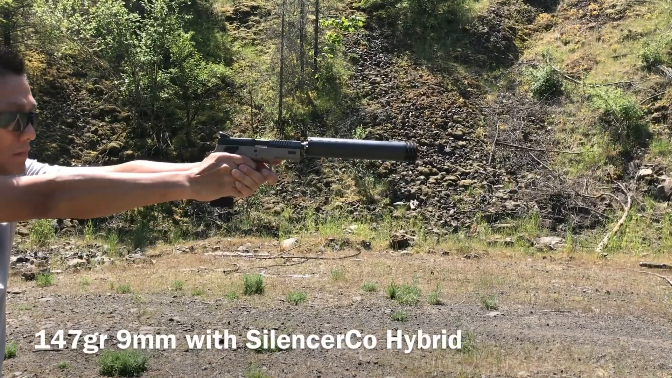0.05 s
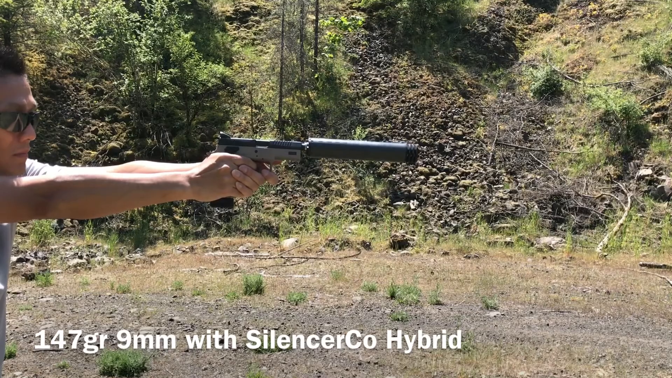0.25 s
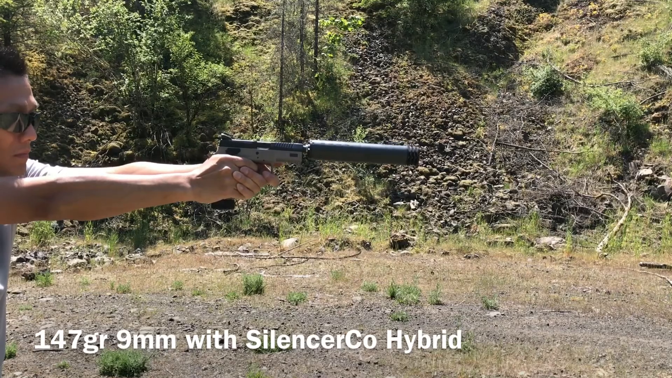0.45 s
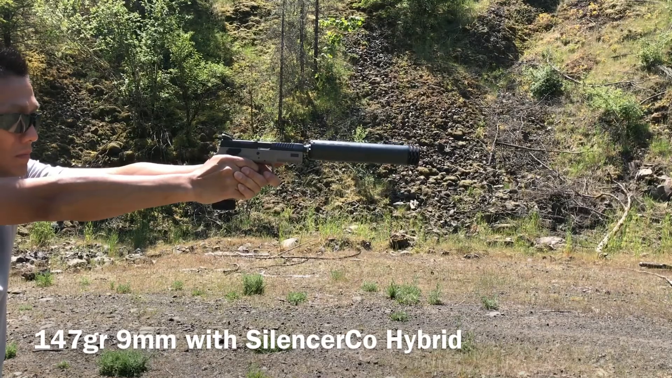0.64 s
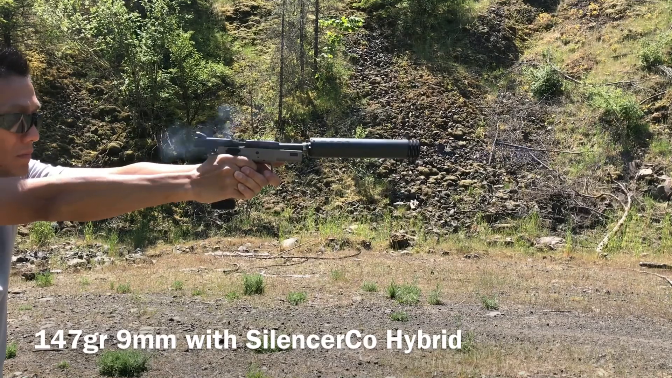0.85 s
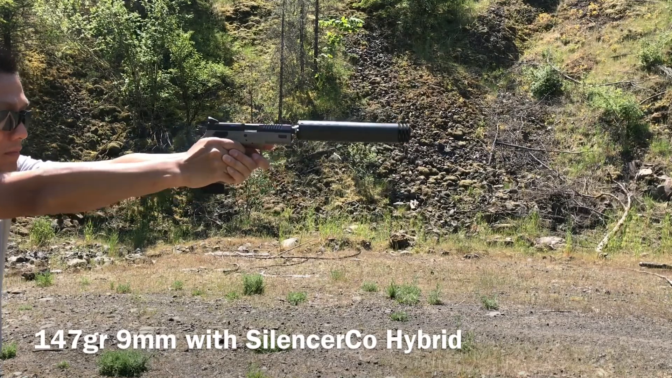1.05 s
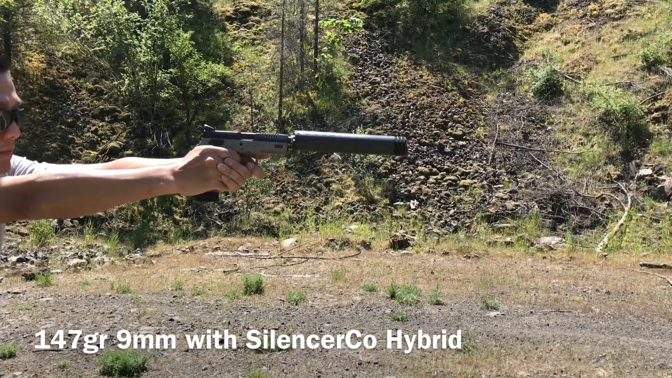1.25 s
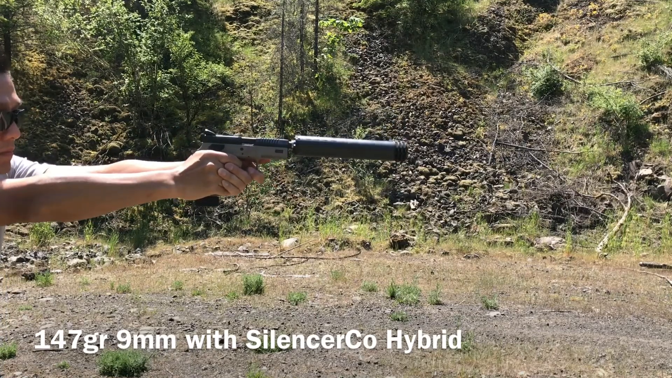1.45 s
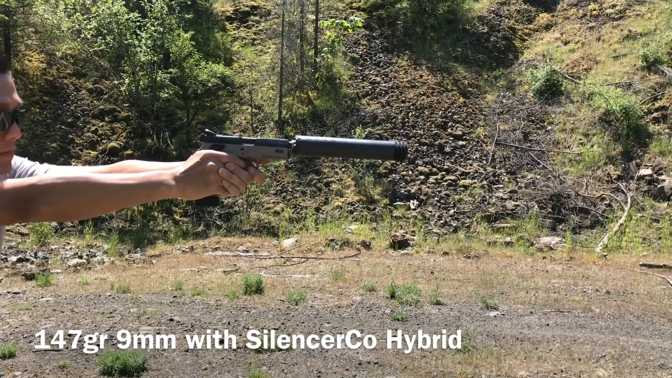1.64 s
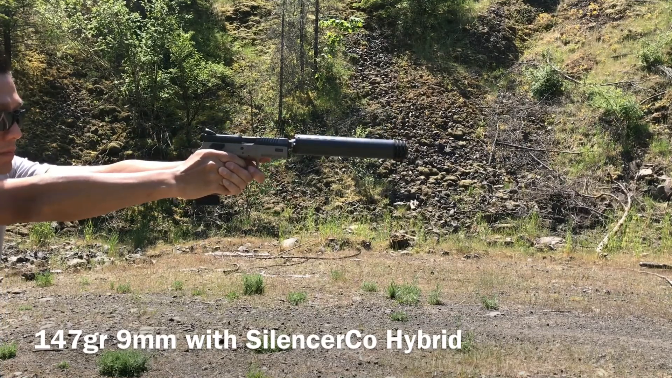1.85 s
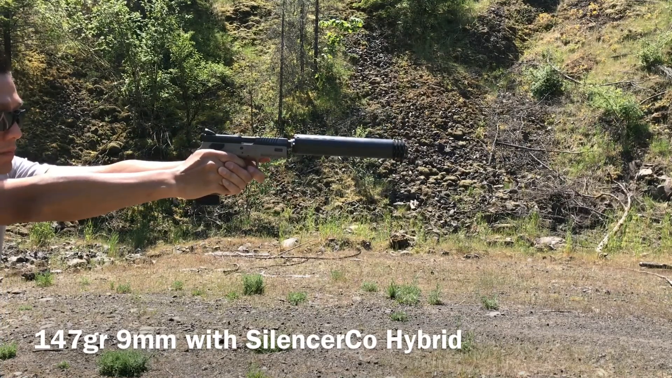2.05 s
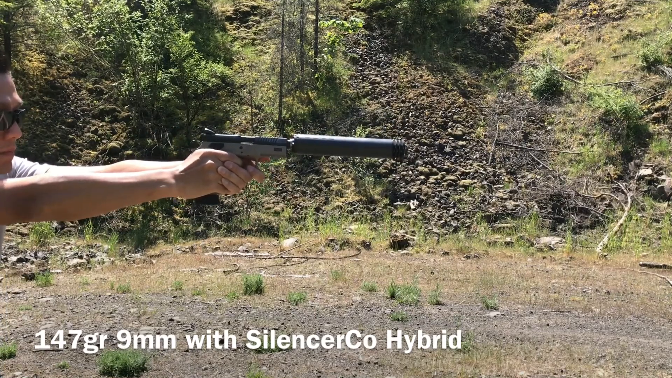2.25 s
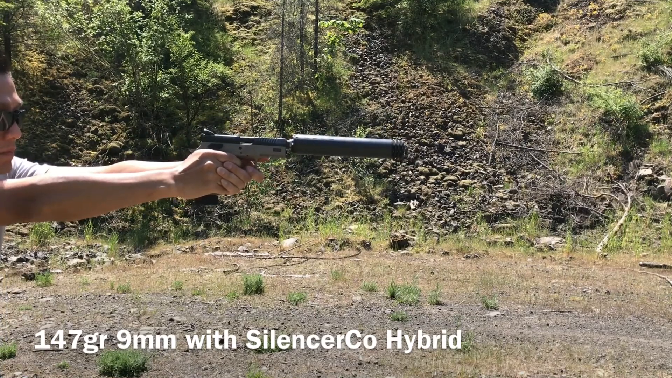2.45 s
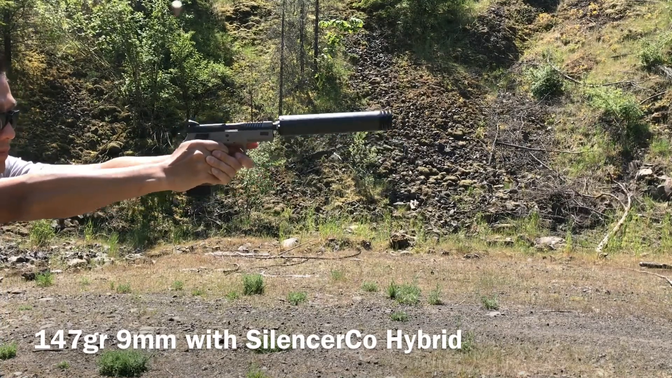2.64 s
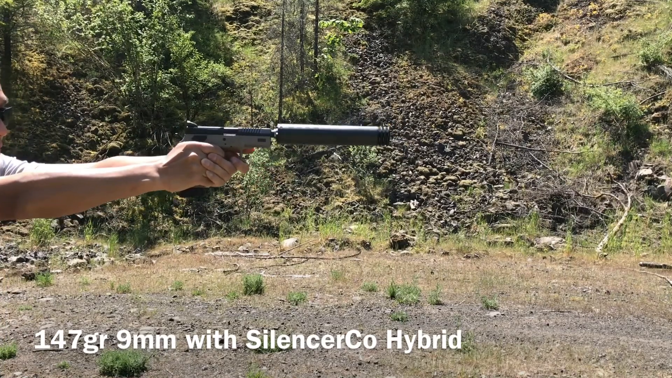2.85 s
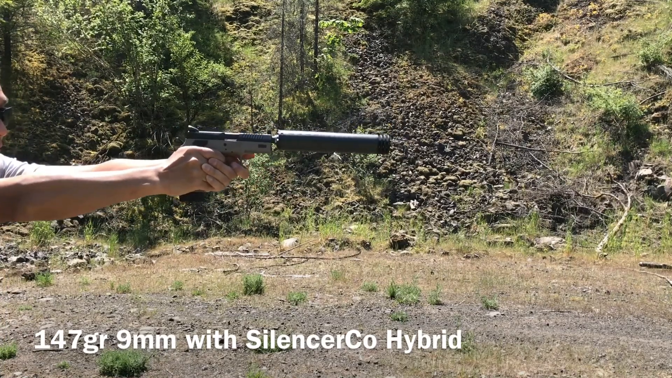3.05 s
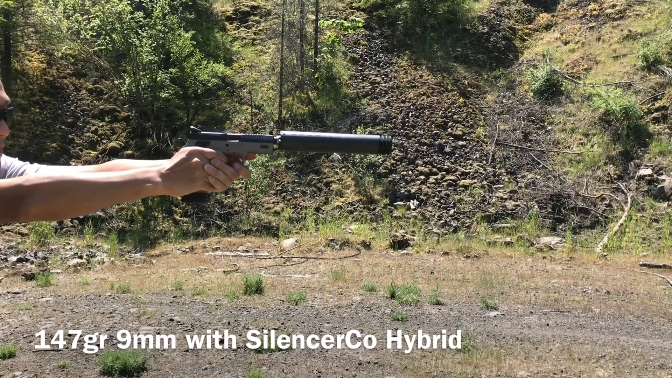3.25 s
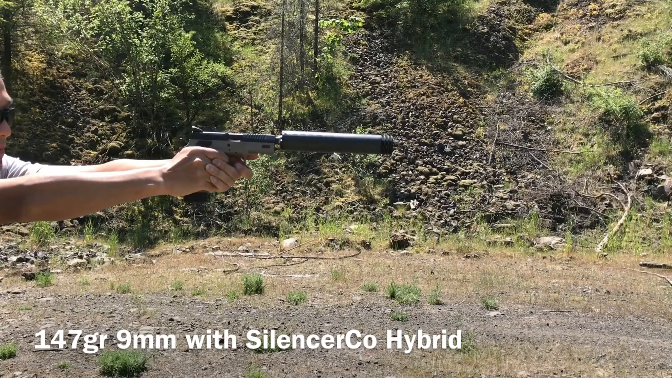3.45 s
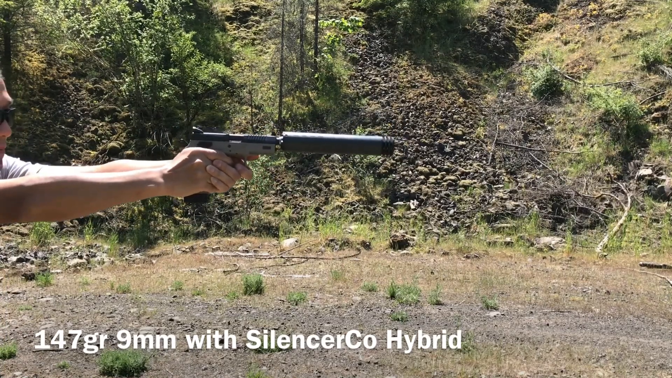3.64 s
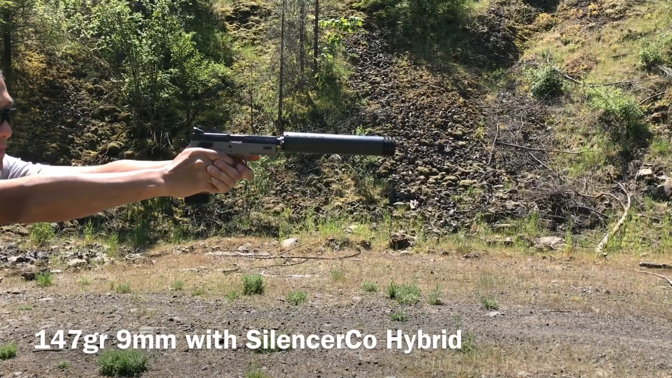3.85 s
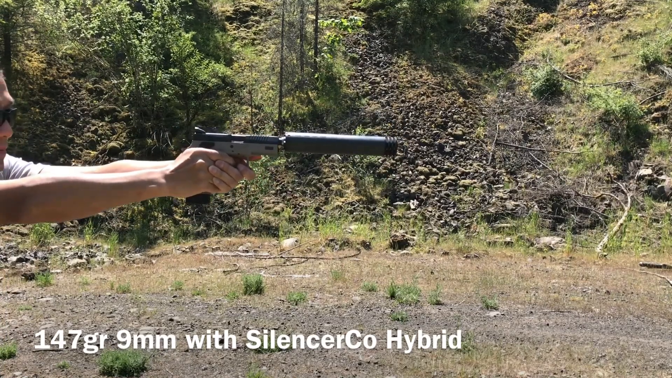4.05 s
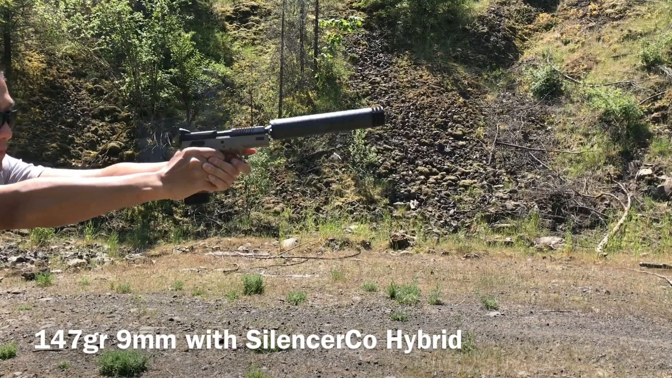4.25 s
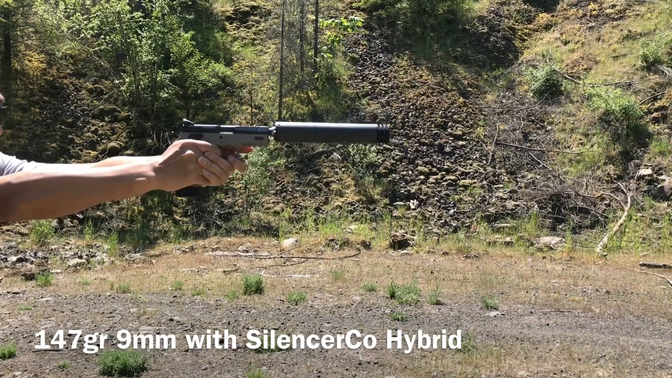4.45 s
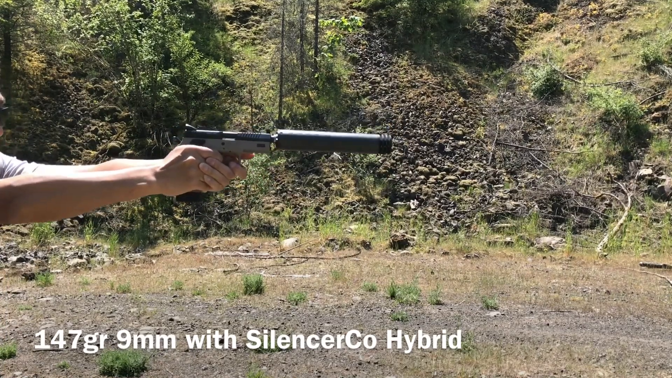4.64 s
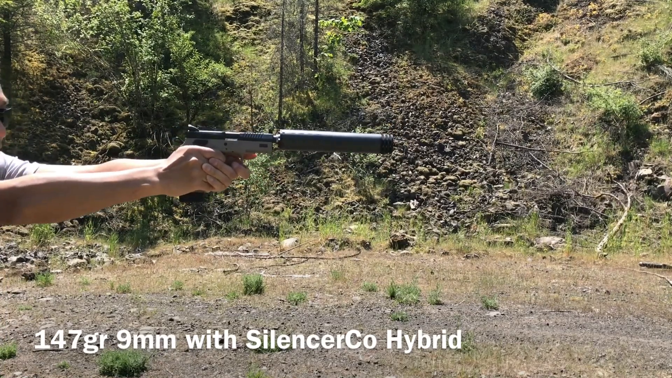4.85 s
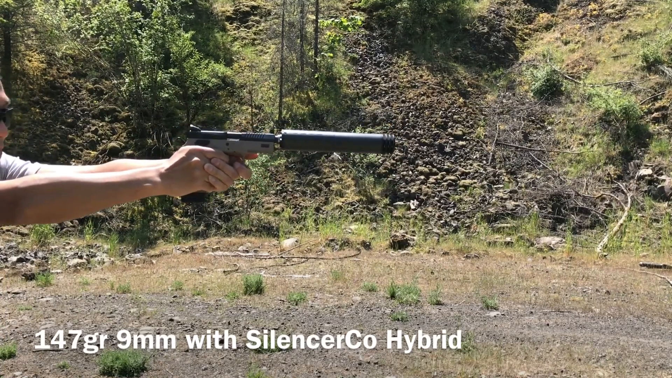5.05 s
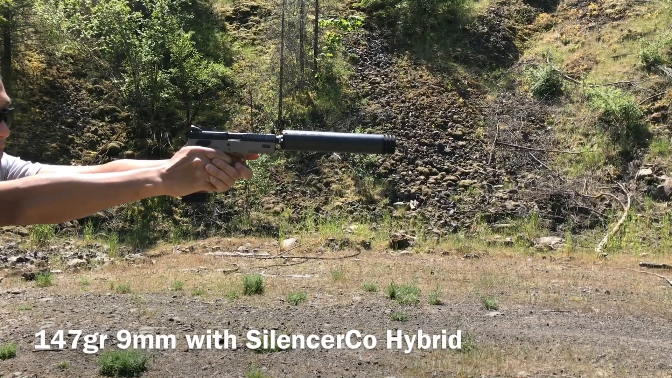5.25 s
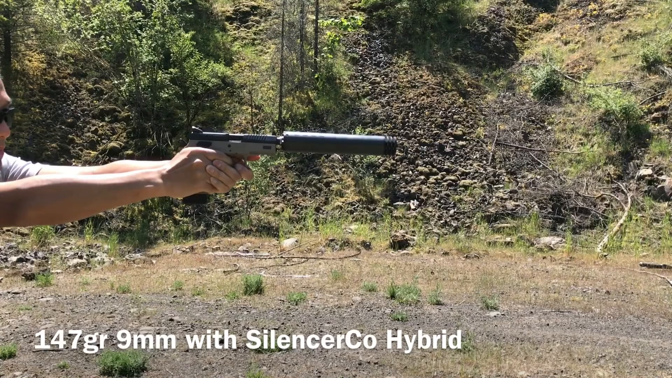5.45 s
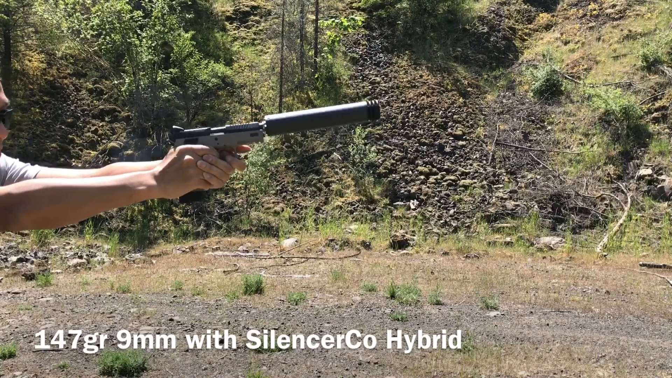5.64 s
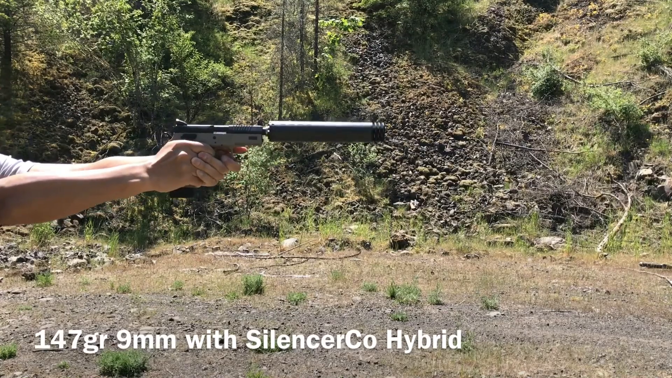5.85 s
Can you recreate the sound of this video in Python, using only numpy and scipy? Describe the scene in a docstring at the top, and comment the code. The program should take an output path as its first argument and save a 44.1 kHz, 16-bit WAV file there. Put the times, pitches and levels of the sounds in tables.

```python
"""From the start, shaped noise gives wind and hiss; steady sines sing thinly; a gliding sine whistles as a far bird.
Noise bursts chip and tick. Then come four slow shots from a suppressed pistol on a gravel range, a metre or two
from a small microphone: hammer clicks, noise puffs of gas that ring steel, a low swept thump, the slide closing.
A rocky slope scatters flickering noise bands and swarms of falling tones; bullet strikes are filtered bursts,
fragments whine as gliding tones, and after the first three shots a case rings its resonances on gravel."""
import sys
import numpy as np
from scipy import signal
from scipy.fft import rfft, irfft
from scipy.io import wavfile
from scipy.ndimage import uniform_filter1d

SR = 44100
rng = np.random.default_rng(int(sys.argv[2]) if len(sys.argv) > 2 else 0)


def convert_level_to_amplitude(level_db):
    """Map a level in decibels to its linear amplitude factor."""
    exponent = np.asarray(level_db, float) / 20
    return 10 ** exponent


def bounce(signal):
    """Save signal as a 16-bit WAV file at the path given by the first command-line argument."""
    frames = np.transpose(np.atleast_2d(signal))
    limited = np.clip(frames, -1, 1)
    pcm = np.round(limited * 32767).astype(np.int16)
    wavfile.write(sys.argv[1], SR, pcm)


N = 260190
T = np.arange(N) / SR  # time/s

# Levels in the tables are relative to the gains applied where they are used.
# Distant air, spectrum: [f/Hz, density level/dB]
AIR_SPECTRUM = [(290, -29.5), (500, -4), (1020, -4.5), (1260, -7.5), (1370, -9), (1920, -14), (4830, -22.5),
                (14500, -32), (16500, -30.5)]
AIR_DB = -64
# Thin steady tones in the hiss: [f/Hz, rms level/dB]
THIN_TONES = [(9663, -89), (10616, -89.5), (11806, -88), (13954, -106), (15030, -102)]
# Times at which the hiss steps up, near sharp sounds: [t/s]
HISS_UP = [.878, 1.075, 1.566, 2.57, 2.822, 3.666, 4.231, 4.528, 5.128, 5.617]
HISS_HOLD_S = .407
# Strength of the breeze on the microphone: [t/s, level/dB]
BREEZE = [(0, -49.5), (.25, -48.5), (.5, -46), (.7, -49), (.87, -38), (1.3, -41.5), (1.78, -39),
          (1.98, -46), (2.08, -38.5), (2.14, -51.5), (2.5, -45.5), (3.0, -48.5), (3.3, -45), (3.47, -35),
          (3.57, -41.5), (3.85, -37), (4.18, -31.5), (4.5, -35.5), (4.9, -39.5), (5.15, -36), (5.32, -50),
          (5.45, -38), (5.62, -26), (5.9, -37.5)]
# Eddies that slap the port and swell the wind around them: [t/s, slap peak level/dB, swell/dB, swell width/s]
EDDIES = [(0.451, -59, 7.5, 0.033), (.585, -62, 2.5, 0.02), (1.537, -35, 4, .03), (1.751, -55, 6, 0.025),
          (2.302, -28, 12.5, 0.042), (2.962, -61, 1.5, 0.02), (3.148, -40, 2.5, 0.12),
          (3.187, -53, 9, 0.055), (3.47, -60, -0.5, 0.017), (3.694, -38.5, 6.5, 0.045),
          (3.884, -29, 6.5, 0.052), (3.941, -30.5, 4, 0.035), (4.095, -17.5, 4.5, 0.036),
          (4.153, -24, 6, 0.0161), (4.607, -41, 2.5, 0.023), (4.628, -29, 8, 0.022), (4.67, -41, 3.5, .02),
          (4.885, -56, 5, 0.01), (4.99, -33, 4, 0.029), (5.049, -29.5, 7, 0.038), (5.17, -45, 4, 0.029),
          (5.433, -45, 7.5, 0.015), (5.497, -37, 3.5, 0.022)]
# Wind spectra, low rumble, higher flutter and single slaps: [f/Hz, density level/dB]
RUMBLE = [(15, -15.5), (30, -12), (55, 3.5), (90, -4), (140, -8.5), (200, -26), (300, -76)]
FLUTTER = [(100, -31.5), (160, 2), (220, 0), (350, -8.5), (550, -28), (900, -41), (1500, -62)]
SLAP = [(60, -45), (150, -1), (250, 5.5), (500, -3), (800, -18), (1200, -82), (2000, -100)]
DIP_DB, DIP_S, DIP_WIDTH_S = -9.5, .17, 0.16  # the wind noise dips after every shot
FLUTTER_DB, FLUTTER_SLOPE = -14, 1  # offset from the rumble level; growth in dB per dB of breeze
WAVER_DB = 1.5  # spread of the rumble level
# Bird whistles, one list a note: [t/s, f/Hz, rms level/dB]
BIRD_NOTES = [
    [(0, 6235, -82.5), (.05, 5500, -74), (.11, 4750, -75.5), (.17, 4498, -65.5), (.19, 4350, -78.5)],
    [(.22, 3150, -82.5), (.28, 3390, -69), (.33, 3770, -62.5), (.345, 4056, -81)],
    [(.40, 5250, -69.5), (.425, 4950, -66.5)],
    [(.46, 5620, -69), (.485, 4850, -65.5), (.50, 4330, -72)],
    [(.585, 5200, -71), (.62, 4536, -65.5), (.645, 3693, -68), (.67, 2993, -70)],
]
# Short bird chips: [t/s, peak level/dB, centre f/Hz, first resonance width/Hz, t60/s]
BIRD_CHIPS = [(.421, -49, 4130, 1160, 0.09), (.444, -38.5, 3617, 930, 0.044), (.527, -46, 3500, 685, .03),
              (.543, -44.5, 3500, 600, 0.026), (.602, -52, 3500, 715.6, .03)]
# Faint ticks in the gravel: [t/s, peak level/dB, centre f/Hz, first resonance width/Hz, t60/s]
GRAVEL_TICKS = [(.446, -55, 11500, 250, 0.054), (.446, -46.5, 8230, 7000, .04),
                (2.195, -53, 2050, 490, 0.03), (2.339, -41, 6000, 3000, 0.0082),
                (2.347, -47, 5500, 2010, 0.014), (2.40, -54, 4040, 3015, 0.028),
                (3.3374, -53, 6000, 5000, 0.023), (4.198, -52.5, 2910, 4030, 0.026),
                (4.539, -37, 4880, 3000, 0.035), (5.118, -45, 3000, 5020, 0.017)]
# Shots: [t/s, blast level/dB, thump delay/s, thump level/dB, settled thump f/Hz]
SHOTS = [(0.8998, -10, .0095, -2.5, 57.4), (2.592, -9.5, .010, -2, 56.8), (4.253, -11, .0125, -9.5, 49.7),
         (5.640, -10, 0.0085, -3, 58)]
# Trigger and hammer before the blast: [delay from shot/s, level/dB, t60/s]
HAMMER = [(-.0228, -29, .015), (-.0195, -31, .015), (-.0175, -25, .008), (-.016, -40, .12)]
# Resonances of the steel: [f/Hz, width/Hz, level/dB]
STEEL = [(1950, 360, -12), (2750, 210, 1.5), (3500, 670, -2.5), (5500, 1200, 2), (10200, 700, -12),
         (12300, 1700, -12)]
# Gas leaving can and breech in puffs: [delay from shot/s, level over blast/dB, t60/s]
PUFFS = [(0., 5.5, 0.018), (.0022, 2, 0.016), (.0052, 7, 0.018), (0.0108, -3.5, 0.023), (.013, -0.5, 0.043),
         (0., -10, 0.078)]
# Spectrum of the gas jet: [f/Hz, density level/dB]
BLAST_SPECTRUM = [(210, -25.5), (350, -2), (600, 0.5), (921, -5), (2200, -6.5), (3510, -6), (4190, -11.5),
                  (5340, -9.5), (7610, -14.5), (9090, -10), (15000, -17), (16500, -23.5)]
# Slide running forward, round feeding, lock-up, rebound: [delay from lock-up/s, level/dB, t60/s]
SLIDE = [(-.02, -13, .12), (-.0055, -7, .025), (-.0003, 5, .007), (.002, -18, .05), (.0115, -14, .012)]
# Resonances of the locking slide: [f/Hz, width/Hz, level/dB]
LOCK = [(2000, 2200, -6.5), (3700, 600, 1), (5520, 380, 0.5), (8900, 590, 1.5), (12400, 870, 0.5)]
KICK_DB, SLIDE_DB = -8, -11.5  # slide on its rear stop; slide back home
HOME_S = .045  # from the shot to lock-up
# What ground, trees and far hillside return of every shot: [delay/s, rise/s, level/dB, treble/dB, t60/s]
RETURNS = [(.04, 0.03, -43, 10, 0.81), (.15, 0.035, -58, -18.5, 2.55)]
# Answering slope patches and showers of thrown grit: [t/s, level/dB, t60/s, share of whizzes 0-1]
PATCHES = [(0.974, -36.5, 0.35, 0.05), (1.078, -41.5, 0.29, 0), (1.133, -42, 0.49, 0),
           (1.27, -58, 1.9, 0.47), (1.545, -53.5, 0.49, .2), (2.728, -36.5, 0.64, 0.47),
           (2.775, -35, 0.44, 0), (2.815, -29, 0.28, 0.1), (2.868, -42, 0.68, 0.5),
           (2.92, -47.5, 0.23, 0.63), (3.0, -65, 0.22, 0.7), (3.09, -60, 3.6, 0.96), (3.2, -58, 0.67, 0.5),
           (3.245, -53.5, 0.49, 0.8), (3.329, -52.5, 0.35, 0.7), (4.34, -39.5, 0.072, 0.1),
           (4.432, -42.5, 0.31, 0.5), (4.486, -46, 0.41, 0), (5.778, -43.5, 1.1, 0.6),
           (5.858, -34, 0.27, 0)]
PATCH_RISE, PATCH_TREBLE_DB = 0.019, -11.5  # rise as a share of t60; treble level
TREBLE_HASTE = 1  # the treble fades faster by this share
# Bands of the slope echo: [f/Hz, level/dB]
SLOPE_BANDS = [(700, -23.5), (1000, -20), (1400, -14), (2000, -12), (2800, -4), (4000, -5.5), (5600, -2),
               (8000, -9.5), (11200, -13), (14000, -16)]
# Bullet on rock: [t/s, peak level/dB, centre f/Hz, first resonance width/Hz, t60/s]
ROCK_STRIKES = [(1.0752, -5.5, 3800, 4750, 0.0033), (2.8225, -15.5, 6000, 8030, 0.011),
                (4.4285, -17.5, 3500, 6000, 0.014), (5.861, -27.5, 4860, 6000, .015)]
# Tumbling bullet fragments whining away, one list each: [t/s, f/Hz, rms level/dB]
WHINES = [
    [(1.085, 870, -58), (1.15, 690, -58.5), (1.22, 592, -63.5), (1.275, 540, -76)],
    [(2.825, 520, -54), (2.86, 800, -55), (2.885, 1030, -54), (2.925, 1170, -58), (3.0, 1000, -65),
     (3.08, 870, -73)],
]
# Splinters that zip past with a quick fall in pitch: [t/s, start f/Hz, rms level/dB]
ZIPS = [(2.734, 3700, -41.5), (2.765, 3930, -44), (2.805, 2294, -36.5), (2.823, 6370, -45),
        (2.877, 3700, -37), (3.0, 2410, -47), (3.249, 2590, -50), (3.286, 3330, -48)]
ZIP_S, ZIP_FALL, ZIP_FADE_DB = .023, .65, -12.5  # length, end pitch over start pitch, change of level
# Brass case on gravel, bright knocks, and fainter, duller touches before or after them:
# [t/s, peak level/dB, upper corner f/Hz]
CASE_LANDINGS = [(1.5661, -12.5, 15100), (1.7846, -37.5, 5040), (3.3848, -28, 6000), (3.6661, -10.5, 16720),
                 (3.869, -47, 3000), (5.1274, -9, 18080)]
# Resonances of the case: [f/Hz, width/Hz, level/dB]
BRASS = [(1060, 370, -2.5), (1770, 170, 5.5), (3150, 620, -2), (6000, 330, 3), (9980, 1130, 1.5),
         (12300, 1140, -1), (14200, 930, -2.5)]


def noise():
    """White noise: equal power at all frequencies."""
    return rng.standard_normal(N)


def colour(x, points):
    """Spectral shaping: weights x by (f/Hz, level/dB) points and normalises its spread to 1."""
    hz, db = np.transpose(points)
    f = np.maximum(np.fft.rfftfreq(len(x), 1 / SR), 1)
    gain = convert_level_to_amplitude(np.interp(np.log(f), np.log(hz), db))
    y = irfft(rfft(x) * gain, len(x))
    return y / np.std(y)


def band(x, hz, width):
    """Two-pole resonance with gain 1 at the centre."""
    return signal.lfilter(*signal.iirpeak(hz, hz / width, SR), x)


def ring(x, modes):
    """Modal superposition: the resonances of a body add with alternating sign."""
    return sum((-1) ** k * convert_level_to_amplitude(db) * band(x, hz, width) for k, (hz, width, db) in enumerate(modes))


def fade(s, t60, rise=0.0008):
    """Exponential decay: an envelope rising from s that falls 60 dB in t60."""
    out, i = np.zeros(N), int(s * SR)
    t = T[:min(N - i, int(2 * t60 * SR))]
    out[i:i + len(t)] = np.minimum(t / rise, 1) * convert_level_to_amplitude(-60 * t / t60)
    return out


def bell(s, width):
    """Gaussian envelope: a smooth rise and fall around s."""
    return np.exp(-((T - s) / width) ** 2)


def flicker(rate):
    """Random modulation: levels drawn at a rate/Hz, joined smoothly, spread 1."""
    k = int(SR / rate)
    steps = np.repeat(rng.standard_normal(N // k + 1), k)
    smooth = uniform_filter1d(steps, k)[:N]
    return smooth / np.std(smooth)


def distant(x, t60, wet_db):
    """Reverberation: convolution with decaying noise, the blur of trees and rock around a far source."""
    t = T[:int(t60 * SR)]
    tail = rng.standard_normal(len(t)) * convert_level_to_amplitude(-60 * t / t60)
    return x + convert_level_to_amplitude(wet_db) * signal.fftconvolve(x, tail / np.linalg.norm(tail))[:N]


def whistle(notes, rough_db):
    """Frequency modulation: gliding sines whose level is roughened at random."""
    out = np.zeros(N)
    for note in notes:
        s, hz, db = np.transpose(note)
        on = slice(int(s[0] * SR), int(s[-1] * SR))
        turns = np.cumsum(np.interp(T[on], s, hz)) / SR
        tone = np.sin(2 * np.pi * turns)
        level = np.sqrt(2) * convert_level_to_amplitude(np.interp(T[on], s, db))
        out[on] += level * signal.windows.tukey(len(tone), .2) * tone
    return out * convert_level_to_amplitude(rough_db * flicker(110))


def clicks(rows):
    """Impulsive excitation: decaying noise bursts through two resonances in series."""
    out = np.zeros(N)
    for s, peak_db, hz, width, t60 in rows:
        i = int(s * SR)
        t = T[:min(N - i, int(t60 * SR))]
        burst = rng.standard_normal(SR // 4)[:len(t)] * convert_level_to_amplitude(-60 * t / t60)
        y = band(band(burst, hz, width), hz, 0.9 * width)
        out[i:i + len(t)] += convert_level_to_amplitude(peak_db) * y / np.max(np.abs(y))
    return out


def floor():
    """Stationary background: distant air and thin tones; a stepped hiss replaces the tones at set times."""
    up = np.any([(T > s) & (T < s + HISS_HOLD_S) for s in HISS_UP], axis=0)
    hiss = colour(noise(), [(300, -25.5), (1500, 2.5), (6000, 1.5), (16000, -5.5)])
    tones = sum(np.sqrt(2) * convert_level_to_amplitude(db) * np.sin(2 * np.pi * hz * T) for hz, db in THIN_TONES)
    air = convert_level_to_amplitude(AIR_DB + flicker(8.2)) * colour(noise(), AIR_SPECTRUM)
    return air + convert_level_to_amplitude(-65.5) * hiss * up + tones * (1 - up)


def wind():
    """Turbulent pressure: eddies on the port give a rumble, a spikier flutter above it and single slaps."""
    swell_db = sum(db * bell(s, width) for s, _, db, width in EDDIES)
    dips_db = sum(DIP_DB * bell(s + DIP_S, DIP_WIDTH_S) for s, *_ in SHOTS)
    breeze_db = np.interp(T, *np.transpose(BREEZE)) + swell_db + dips_db
    flutter_db = -39.5 + FLUTTER_DB + FLUTTER_SLOPE * (breeze_db + 39.5)
    flutter_db = flutter_db + .8 * swell_db + 2.6 * flicker(18)
    rumble = colour(noise() * convert_level_to_amplitude(3 * flicker(25)), RUMBLE)
    flutter = colour(noise() * convert_level_to_amplitude(3 * flicker(60)), FLUTTER)
    slaps, t = np.zeros(N), T[:int(.04 * SR)]
    for s, peak_db, *_ in EDDIES:
        y = colour(rng.standard_normal(len(t)), SLAP) * np.exp(-((t - .02) / 0.0018) ** 2)
        i = int((s - .016) * SR)
        slaps[i:i + len(t)] += convert_level_to_amplitude(peak_db) * y / np.max(np.abs(y))
    return convert_level_to_amplitude(breeze_db + WAVER_DB * flicker(15)) * rumble + convert_level_to_amplitude(flutter_db) * flutter + slaps


def bird():
    """Gliding near-sines reach the ear with their reverberation."""
    return distant(whistle(BIRD_NOTES, 2.), 1.3, -4.0)


def chips():
    """Band-limited transients: short far bird chips with their reverberation."""
    return distant(clicks(BIRD_CHIPS), .6, -8.5)


def gravel_ticks():
    """Impulsive excitation of gravel: faint filtered bursts."""
    return clicks(GRAVEL_TICKS)


def hammer():
    """Impact excites steel modes; a thin tone grows between the fall of the hammer and the blast."""
    envelope = sum(convert_level_to_amplitude(db) * fade(s + d, t60) for s, *_ in SHOTS for d, db, t60 in HAMMER)
    tick = noise() * envelope
    singing = np.zeros(N)
    for s, *_ in SHOTS:
        gate = (T > s - .014) & (T < s)
        singing = singing + convert_level_to_amplitude(-32) * gate * convert_level_to_amplitude(500 * (T - s).clip(-.014, 0))  # grows 500 dB/s
    return convert_level_to_amplitude(0.5) * tick + convert_level_to_amplitude(8) * ring(tick, STEEL) + singing * np.sin(2 * np.pi * 3100 * T)


def gas_blast():
    """Jet noise in ragged puffs rings the steel, and the air in the can booms by cavity resonance."""
    gas = sum(convert_level_to_amplitude(blast_db + db) * fade(s + d, t60)
              for s, blast_db, *_ in SHOTS for d, db, t60 in PUFFS)
    jet = colour(noise(), BLAST_SPECTRUM) * convert_level_to_amplitude(flicker(900)) * gas
    # the boom starts to swell just before the first puff and goes on growing through them
    boom = sum(fade(s - .007, 0.055, 0.042) for s, *_ in SHOTS)
    can = convert_level_to_amplitude(19.5) * band(noise() * boom, 310, 160)
    return convert_level_to_amplitude(-4.0) * jet + convert_level_to_amplitude(3.0) * ring(noise() * gas, STEEL) + convert_level_to_amplitude(-3.5) * can


def thump():
    """Pressure swing of the expelled gas: a chirp that settles on a low bounce, led by a slide kick."""
    out = np.zeros(N)
    for s, _, lag, thump_db, thump_hz in SHOTS:
        t = np.maximum(T - s - lag, 0)
        turns = thump_hz * t + 0.33 * (1 - np.exp(-t / 0.00051))
        envelope = np.minimum(t / 0.0015, 1) * np.exp(-(t / 0.018) ** 2.1)
        out = out - convert_level_to_amplitude(thump_db) * envelope * np.sin(2 * np.pi * turns)
        # a short kick as the slide hits its stop, just ahead of the swing
        out = out + convert_level_to_amplitude(KICK_DB) * bell(s + lag - 0.00095, 0.0011)
    return out


def slide_home():
    """Impact and friction: noise bursts of the closing slide excite its lock-up modes."""
    envelope = sum(convert_level_to_amplitude(SLIDE_DB + db) * fade(s + HOME_S + d, t60)
                   for s, *_ in SHOTS for d, db, t60 in SLIDE)
    hit = noise() * envelope
    return convert_level_to_amplitude(-6.5) * band(hit, 4800, 16000) + convert_level_to_amplitude(6.5) * ring(hit, LOCK)


def whizz_swarm():
    """Granular superposition: 2600 short tones of falling pitch, slightly blurred."""
    swarm, t = np.zeros(N + SR), T[:int(.018 * SR)]
    for at, pitch, fall, size in rng.random((2600, 4)):
        hz = 2000. * 2 ** (1.15 * pitch) * np.exp(-t * (13.0 + 17.0 * fall))
        i = int(at * N)
        tone = np.sin(2 * np.pi * np.cumsum(hz) / SR)
        swarm[i:i + len(t)] += convert_level_to_amplitude(9 * size) * np.hanning(len(t)) * tone
    swarm = distant(swarm[:N], 0.2, -2.5)
    return swarm / np.std(swarm)


def slope():
    """Diffuse scattering: echo powers add in flickering bands and in swarms of falling whizzes."""
    echoes = [(s + d, rise, db, top_db, t60, .2) for s, *_ in SHOTS for d, rise, db, top_db, t60 in RETURNS]
    echoes += [(s, PATCH_RISE * t60, db, PATCH_TREBLE_DB, t60, share) for s, db, t60, share in PATCHES]
    wash = np.zeros(N)
    for hz, band_db in SLOPE_BANDS:
        treble = np.clip(np.log(hz / 4000) / np.log(9000 / 4000), 0, 1.4)  # the top dies first
        power = np.zeros(N)
        for s, rise, db, top_db, t60, share in echoes:
            envelope = convert_level_to_amplitude(db + treble * top_db) * fade(s, t60 / (1 + TREBLE_HASTE * treble), rise)
            power = power + (1 - min(share, .9) ** 2) * envelope ** 2
        grain = band(band(noise(), hz, hz / 1.6), hz, hz / 1.6)
        wash = wash + convert_level_to_amplitude(band_db + 0.54 * flicker(60)) * np.sqrt(power) * grain / np.std(grain)
    whizz_power = sum((share * convert_level_to_amplitude(db) * fade(s, t60, rise)) ** 2 for s, rise, db, _, t60, share in echoes)
    return wash + convert_level_to_amplitude(2.5) * np.sqrt(whizz_power) * whizz_swarm()


def rock_strikes():
    """Impulsive excitation of rock by the bullet: filtered bursts."""
    return clicks(ROCK_STRIKES)


def splinters():
    """Gliding tones: long whines of tumbling fragments and short blurred zips."""
    zips = [[(s, hz, db), (s + ZIP_S, ZIP_FALL * hz, db + ZIP_FADE_DB)] for s, hz, db in ZIPS]
    return whistle(WHINES, 2) + distant(whistle(zips, 5), .08, 2)


def cases():
    """Modal excitation: a sharp knock, a scrape of stones and a small second touch ring the brass."""
    out = np.zeros(N)
    t = T[:int(.04 * SR)]
    knock = convert_level_to_amplitude(-60 * t / 0.0057)
    scrape = convert_level_to_amplitude(-9.5 - 60 * t / 0.01)
    touch = (t > .0055) * convert_level_to_amplitude(-15.5 - 60 * (t - .0055) / 0.013)
    for s, peak_db, upper_hz in CASE_LANDINGS:
        push = rng.standard_normal(len(t)) * (knock + scrape + touch)
        push[0] = 4.  # the first contact is one hard edge
        body = ring(push, BRASS) + convert_level_to_amplitude(-9.0) * push
        y = signal.lfilter(*signal.butter(1, [600, upper_hz], "band", fs=SR), body)
        i = int(s * SR)
        out[i:i + len(t)] += convert_level_to_amplitude(peak_db) * y / np.max(np.abs(y))
    return out


def scene():
    """Linear superposition of all sources at one microphone."""
    background = floor() + wind()
    far = bird() + chips() + slope() + splinters()
    pistol = hammer() + gas_blast() + thump() + slide_home()
    near = gravel_ticks() + pistol + rock_strikes() + cases()
    return (background + far + near)[None]


def top_cut(x):
    """Nothing passes above the cut-off."""
    return signal.sosfilt(signal.butter(12, 16810, fs=SR, output="sos"), x)


def record(dry):
    """Saturation and band limiting: the loudest peaks are rounded off, then the top is cut."""
    rounded = np.tanh(1.162 * dry) / 1.099
    low_pass = signal.ellip(6, .2, 50, 15900, fs=SR, output="sos")
    mix = signal.sosfilt(low_pass, rounded)
    return top_cut(mix)


dry = scene()
out = record(dry)
bounce(out)
```